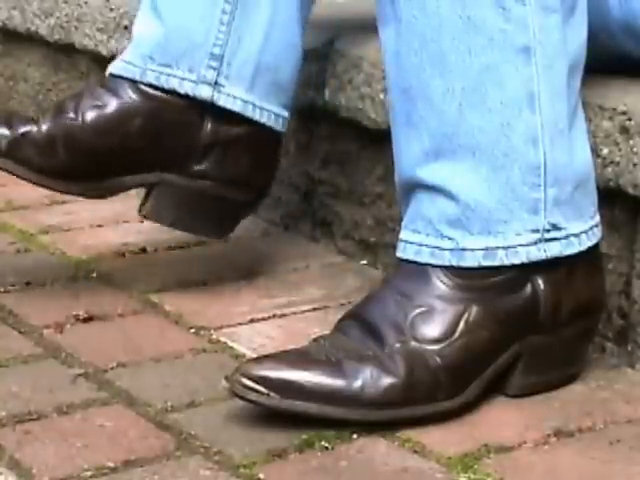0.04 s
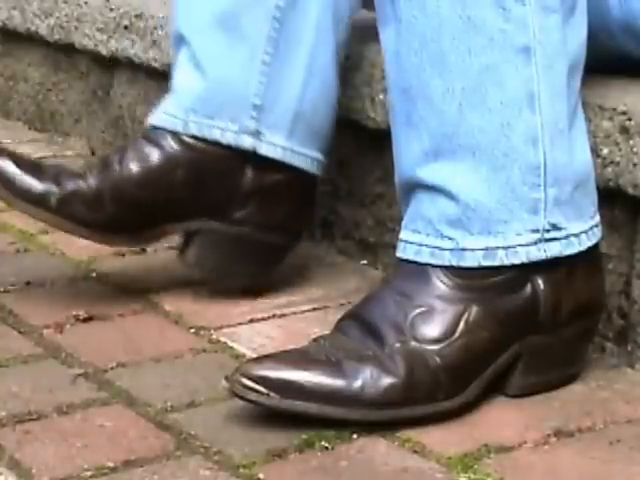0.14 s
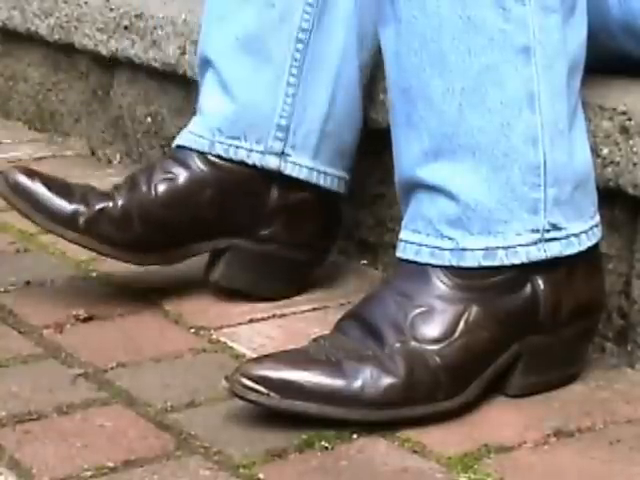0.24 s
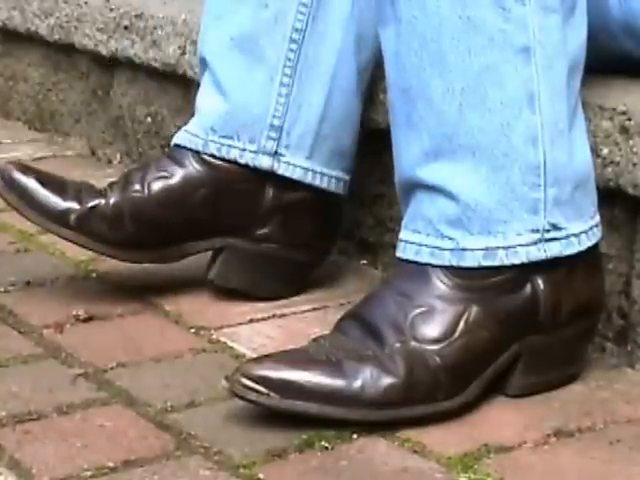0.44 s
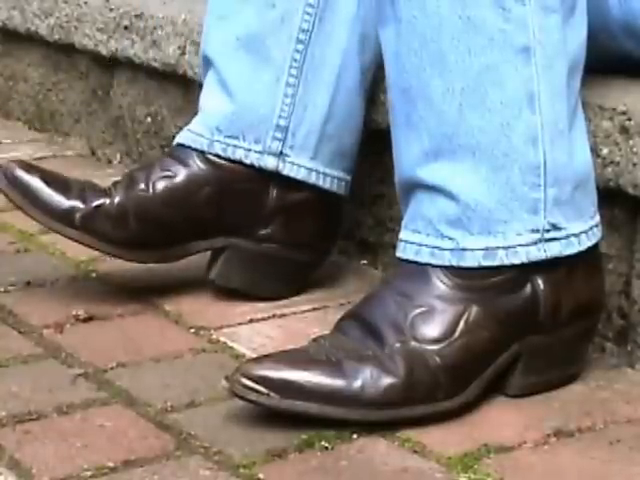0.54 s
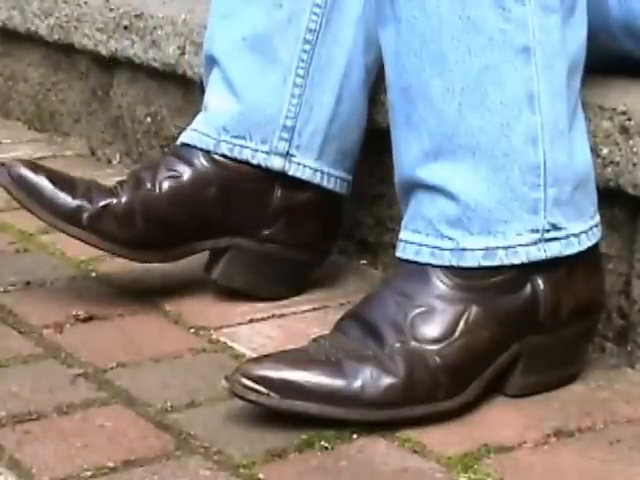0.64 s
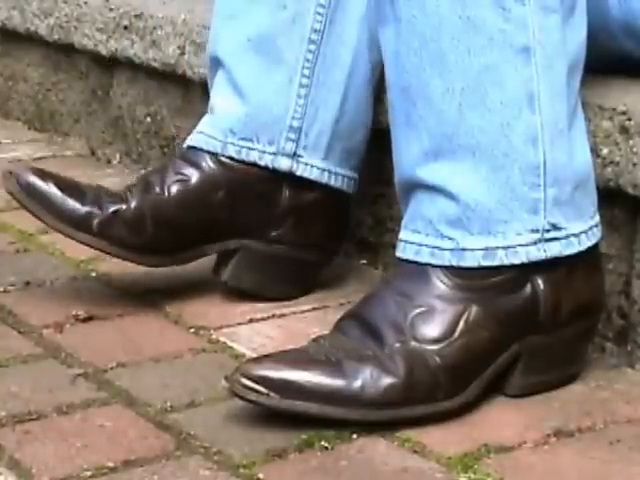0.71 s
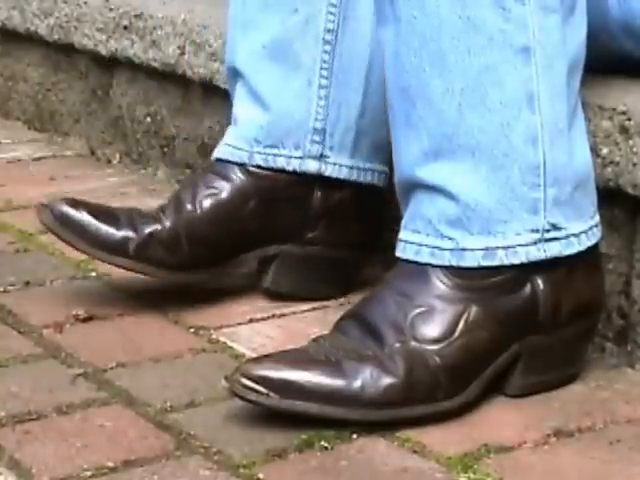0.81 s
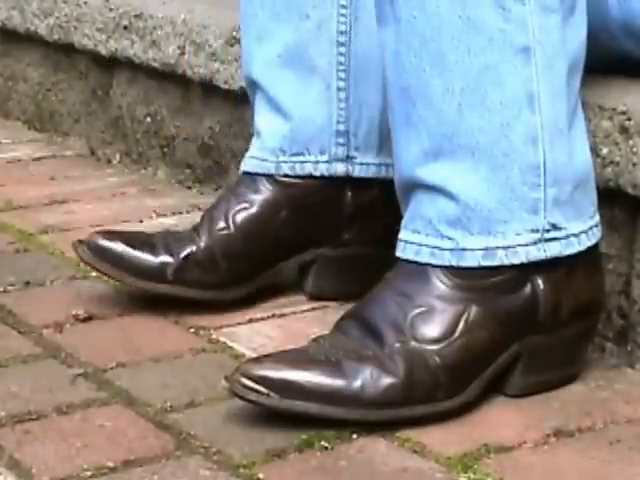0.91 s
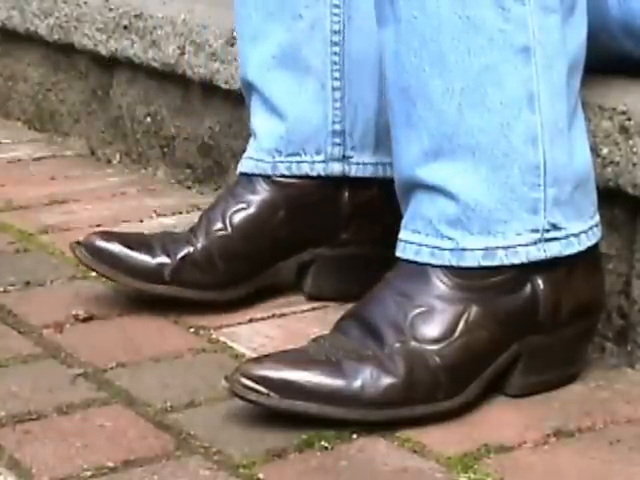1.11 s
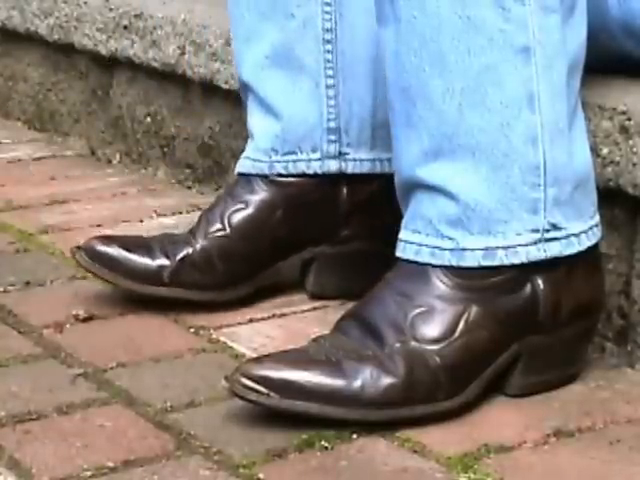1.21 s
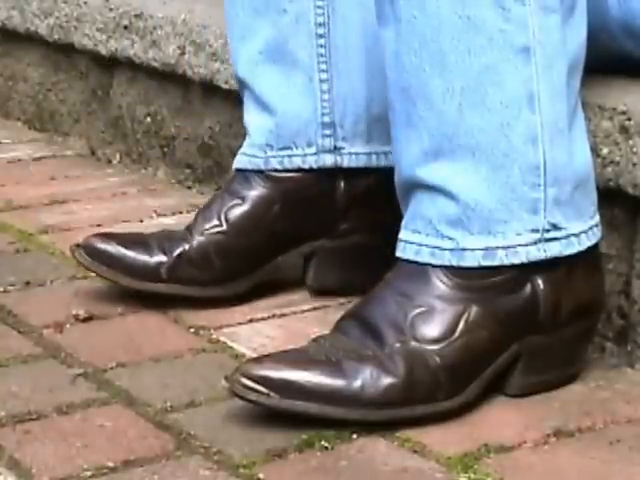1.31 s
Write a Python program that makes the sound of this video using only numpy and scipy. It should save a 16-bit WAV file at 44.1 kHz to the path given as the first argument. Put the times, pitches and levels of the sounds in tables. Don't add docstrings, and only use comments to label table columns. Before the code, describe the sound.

A single boot heel stomp strikes brick paving at about 0.2 seconds: a hard, hollow knock with crushed grit and a brief fluttering echo from the wall. Background town wash dips afterwards, as under automatic gain. From 0.7 to 1.0 seconds the sole scuffs quietly over sand, growing with crackles and a low judder. Soft knocks and three pebble ticks follow until 1.3 seconds. Close stereo pickup, quiet yard.

```python
import sys
import numpy as np
from scipy import signal
from scipy.fft import rfft, irfft
from scipy.io import wavfile
from scipy.ndimage import uniform_filter1d

SR = 44100
rng = np.random.default_rng(int(sys.argv[2]) if len(sys.argv) > 2 else 0)


def voltage_ratio(decibels):
    exponent = np.asarray(decibels, float) / 20
    return 10 ** exponent


def generate_wav(signal):
    frames = np.transpose(np.atleast_2d(signal))
    scaled = np.clip(frames, -1, 1) * 32767
    pcm = np.round(scaled).astype(np.int16)
    wavfile.write(sys.argv[1], SR, pcm)


N = 59535

# (frequency [Hz], level per Hz [dB])
AIR_SPECTRUM = [(20, -18), (35, 3), (130, -3.5), (250, -11.5), (700, -10), (1400, -12), (3500, -20.5),
                (7000, -34), (16000, -41)]
# (frequency [Hz], coherence [0-1])
AIR_COHERENCE = [(60, 0.95), (180, 1), (550, 0.62), (1650, 0.6), (4970, 0.91), (15000, 1)]
# (frequency [Hz], difference [dB])
AIR_PAN = [(60, 4), (240, 5), (950, 0.0), (3770, -1.0), (15000, 0.5)]
# (frequency [Hz], phase [rad])
AIR_LEAD = [(0, 0.82), (690, -0.82), (4050, -0.59), (6800, -1.2), (15800, -0.55)]
# (time [s], gain [dB])
RECORDER_GAIN = [
    (0, 4.5),
    (.12, 4),
    (.178, 6),
    (.188, -1.5),
    (.225, -4),
    (.27, -4),
    (.33, -1.5),
    (.7, -2.5),
    (1.35, -0.5),
]
# (frequency [Hz], T60 [s], level [dB])
YARD_TAIL = [(100, 0.53, -2), (190, 0.19, 3), (432, 0.068, -2), (895, 0.59, -2), (1200, 0.15, -14),
             (2000, 0.028, -6), (8000, 0.046, 0)]
# (frequency [Hz], difference [dB])
BOOT_PAN = [(60, 2.5), (180, 6.5), (550, 1.5), (1650, -1.5), (4970, -1), (15000, -3.5)]
# (frequency [Hz], phase [rad])
BOOT_LEAD = [(0, 1), (780, -1.04), (4220, -0.2), (6980, 0.024), (13400, 0.0), (15800, -0.19)]
# (time [s], peak [dB], frequency [Hz], breadth [held to 0.1-1.5])
SNAPS = [(.372, -45, 9550, 0.4), (0.7016, -43, 11500, 1.2), (0.7026, -41, 7000, 1.2),
         (.716, -50, 11900, 0.5), (0.7464, -46, 13000, 0.9), (0.7484, -51, 9000, 0.9),
         (0.757, -45, 11900, 0.9), (.7985, -32.5, 7360, 1), (0.8094, -26.5, 8000, 0.7),
         (.819, -37, 8000, 0.06), (0.823, -31, 11500, 0.4), (.825, -31, 12000, 1), (.8265, -34, 7000, 0.5),
         (0.827, -36, 5200, 0.3), (.8385, -53, 10000, .7), (.842, -43, 5600, 0.6), (.844, -32, 8200, 1),
         (0.848, -39, 5500, 0.8), (0.85, -44, 5800, .5), (.858, -34, 5600, 1), (.8625, -26.5, 6500, 1),
         (0.868, -35.5, 3400, .3), (.873, -51, 5500, .5), (.877, -41, 3400, 0.3), (0.8937, -30, 9300, 0.05),
         (0.895, -32, 3300, 0), (.897, -43, 4000, 0.9), (0.9055, -24.5, 5530, 1), (0.91, -32, 3400, .3),
         (.9118, -26.5, 8000, 0.54), (.9152, -38, 3500, 0.3), (0.922, -40, 3800, 0.3),
         (0.924, -34, 3900, .4), (0.9307, -37, 3700, .4), (.936, -44, 8000, 1)]
# (frequency [Hz], width [Hz], level [dB])
GRAIN_BANDS = [(3500, 900, 0), (5300, 1000, 0), (6600, 900, -3), (8250, 1100, 0), (9400, 1100, -2),
               (11400, 1300, -6), (13800, 2500, -11)]
# (time [s], peak [dB], frequency [Hz])
KNOCKS = [(.730, -30, 185), (.759, -31, 110), (.843, -28, 140), (.881, -28, 230), (.908, -29, 150),
          (.925, -34, 440), (.935, -31, 85), (.982, -33, 110), (1.09, -33, 75), (1.12, -33, 100),
          (1.14, -39, 350), (1.178, -35, 75), (1.204, -33, 140), (1.204, -39, 420), (1.2755, -34, 300),
          (1.312, -36, 80)]
# (time [s], energy [dB])
PEBBLE_TICKS = [
    (1.113, -31),
    (1.2025, -29),
    (1.2742, -19.5),
]
# (frequency [Hz], width [Hz], level [dB])
PEBBLE_BANDS = [(450, 500, 3), (1200, 1000, -2), (2200, 1200, 1), (3900, 900, -6)]
# (time [s], grit level [dB], body level [dB])
DRAG = [
    (.69, -74, -61),
    (.73, -51, -53),
    (.78, -50.5, -53),
    (.80, -46, -45),
    (.84, -42, -36),
    (.89, -39.5, -34.5),
    (.915, -40, -34.5),
    (.945, -55, -36),
    (.99, -64, -70),
]
# (frequency [Hz], width [Hz], level [dB])
SAND_BANDS = [(1770, 1160, 18.5), (2620, 380, 11), (3220, 2400, 16.5), (5540, 2900, 11), (6500, 390, 3),
              (7620, 2800, 6), (8740, 1500, 2), (11000, 1800, -20), (14400, 5100, -9)]
# (frequency [Hz], width [Hz], level [dB])
SOLE_BANDS = [(88, 32, 7), (147, 33, 7), (220, 110, 6), (305, 80, -1.5), (444, 140, -16), (805, 79, -16)]
# (time [s], frequency [Hz], level [dB])
JUDDER = [
    (.78, 271.2, -50),
    (.80, 274.7, -35),
    (.825, 313.6, -33.5),
    (.85, 278, -37.5),
    (.86, 278, -78),
]
# (frequency [Hz], level [dB], T60 [s])
OUTWARD_MODES = [(188.5, -14.2, .09), (425, 3.3, .017), (505, -19.5, .075), (586, -21.6, .049),
                 (1034, -1.5, .006), (1908, -23, .016), (834, -36, .06)]
# (frequency [Hz], level [dB], T60 [s])
INWARD_MODES = [(138, -12.2, .046), (312, -21.3, .102), (1304, -6.2, .006)]
# (time [s], energy [dB], frequency [Hz])
CRACKS = [(.2148, -13, 2400), (.2150, -20, 3500), (.2148, -27, 5200), (.2160, -16, 2100),
          (.2172, -15, 2900), (.2198, -23, 5200), (.2228, -24, 2800), (.2148, -33, 7200),
          (.2146, -31, 11500), (.2168, -33, 9500), (.2195, -31, 7900), (.2200, -35, 11600),
          (.2167, -31, 5500)]
# (time [s], peak [dB], frequency [Hz])
FLUTTER = [(.2290, -35, 810), (.232, -39, 1120), (.2335, -30, 500), (.239, -37, 850), (.246, -39, 1110),
           (.2495, -29, 495), (.250, -28, 360), (.2505, -29, 830), (.256, -38, 1065), (.2615, -32, 473),
           (.2625, -23, 172), (.2635, -35, 947), (.2655, -29, 700), (.2715, -37, 860), (.2775, -36, 550),
           (.279, -31, 355), (.2795, -33, 753), (.2875, -42, 1130), (.2895, -37, 613), (.2905, -30, 161),
           (.2925, -38, 915), (.2955, -37, 333), (.301, -36, 710), (.3055, -36, 818), (.3065, -35, 150),
           (.314, -38, 333), (.314, -40, 527), (.3205, -33, 118)]


def evened(x):
    return x / np.sqrt(np.mean(x ** 2) + 1e-20)


def read(points, hz):
    f, value = np.transpose(points)
    return np.interp(np.log(hz + 1), np.log(f + 1), value)


def curve(table, column):
    table = np.array(table)
    return np.interp(np.arange(N) / SR, table[:, 0], table[:, column])


def add(mix, at_s, sound):
    part = mix[round(at_s * SR):][:len(sound)]
    part += sound[:len(part)]


def resonate(x, hz, width_hz):
    turn = np.exp(2j * np.pi * hz * np.arange(len(x)) / SR)
    r = np.exp(-np.pi * width_hz / SR)
    return 2 * (turn * signal.lfilter([1 - r], [1, -r], x / turn)).real


def resonate_twice(x, hz, width_hz):
    return resonate(resonate(x, hz, width_hz), hz, width_hz)


def steep(x, hz, width_hz):
    y = resonate_twice(x, hz, width_hz)
    return y / np.linalg.norm(y)


def clicks(per_s, spread_db):
    size = voltage_ratio(spread_db * np.minimum(rng.exponential(1, N), 4))
    sign = rng.choice([-1., 1.], N)
    return evened(size * sign * (rng.random(N) < per_s / SR))


def port_half(pan, lead, hz):
    return voltage_ratio(read(pan, hz) / 2) * np.exp(.5j * read(lead, hz))


def air():
    level_db, patch_db = -39, 0.81
    hz = np.fft.rfftfreq(1024, 1 / SR)
    a, b, c, d, patches = rng.standard_normal((N // 256 + 5, 513, 5)).T
    patches = uniform_filter1d(patches, size=12, axis=0)
    patches = evened(uniform_filter1d(patches, size=10, axis=1))
    same = np.clip(read(AIR_COHERENCE, hz), 0, 1)[:, None]
    one, other = a + 1j * b, c + 1j * d
    half = port_half(AIR_PAN, AIR_LEAD, hz)[:, None]
    z = np.array([one * half, (same * one + np.sqrt(1 - same ** 2) * other) / half])
    z = z * voltage_ratio(read(AIR_SPECTRUM, hz)[:, None] + patch_db * patches)
    wash = signal.istft(z, nperseg=1024, noverlap=768)[1][:, :N]
    return voltage_ratio(level_db) * wash / wash.mean(0).std()


def yard(x):
    gap_s, onset_s = 0.017, 0.0047
    taps = rng.standard_normal((2, SR // 2)) * (rng.random((2, SR // 2)) < .2)
    hz, t, z = signal.stft(taps, SR, nperseg=512)
    table = np.array(YARD_TAIL)
    t60_s = read(table[:, [0, 1]], hz)[:, None]
    colour_db = read(table[:, [0, 2]], hz)[:, None]
    tail = signal.istft(z * voltage_ratio(colour_db - 60 * t / t60_s), SR, nperseg=512)[1]
    tail = tail * np.clip((np.arange(tail.shape[1]) / SR - gap_s) / onset_s, 0, 1)
    hz = np.fft.rfftfreq(tail.shape[1], 1 / SR)
    low = abs(rfft(tail)[:, (hz > 200) & (hz < 600)]).std() + 1e-9
    blended = tail + .5 * tail[::-1]
    return signal.fftconvolve(x[None], blended / low, axes=1)[:, :N]


def ports(x):
    half = port_half(BOOT_PAN, BOOT_LEAD, np.fft.rfftfreq(N, 1 / SR))
    return irfft(rfft(x) * np.array([half, 1 / half]) * 2 / (half + 1 / half), N)


def knocks():
    t60_s, rise_s = 0.085, 0.0017
    out, t = np.zeros(N), np.arange(3000) / SR
    for s, db, hz in KNOCKS:
        tone = voltage_ratio(db - 60 * t / t60_s) * np.sin(2 * np.pi * hz * t)
        add(out, s, tone * np.minimum(t / rise_s, 1))
    return out


def pebble_ticks():
    decay_s = .0012
    out, t = np.zeros(N), np.arange(3000) / SR
    for s, db in PEBBLE_TICKS:
        burst = .15 * rng.standard_normal(3000) * np.exp(-t / decay_s) - 2 * (t == 0)
        tick = sum(steep(burst, hz, 1.3 * width_hz) * voltage_ratio(d) for hz, width_hz, d in PEBBLE_BANDS)
        add(out, s, voltage_ratio(db) * tick)
    return out


def grain_snaps():
    decay_s, narrow_db = .0008, 9
    out, t = np.zeros(N), np.arange(3000) / SR
    for s, db, centre_hz, breadth in SNAPS:
        burst = .22 * rng.standard_normal(3000) * np.exp(-t / decay_s) + 2 * (t == 0)
        snap = np.zeros(3000)
        for hz, width_hz, band_db in GRAIN_BANDS:
            off = np.log2(hz / centre_hz) / np.clip(breadth, .1, 1.5)
            snap += steep(burst, hz, width_hz) * voltage_ratio(band_db - narrow_db * off ** 2)
        add(out, s, voltage_ratio(db) * snap / abs(snap).max())
    return out


def drag():
    crackle_db, rasp_db, body_db = -3, -8, -1.5
    start_s, stop_s = DRAG[0][0], DRAG[-1][0]
    moving = np.interp(np.arange(N) / SR, [start_s - .02, start_s, stop_s, stop_s + 0.032], [0, 1, 1, 0])
    sand = voltage_ratio(crackle_db) * clicks(3000, 2.6) + voltage_ratio(rasp_db) * rng.standard_normal(N)
    grit = sum(voltage_ratio(db) * resonate_twice(sand, hz, width_hz) for hz, width_hz, db in SAND_BANDS)
    grit = evened(grit) * sand.std()
    slips = uniform_filter1d(clicks(860, 2.7), size=20)
    body = evened(sum(voltage_ratio(db) * evened(resonate(slips, hz, width_hz)) for hz, width_hz, db in SOLE_BANDS))
    judder = voltage_ratio(curve(JUDDER, 2)) * np.sin(2 * np.pi * np.cumsum(curve(JUDDER, 1)) / SR)
    return moving * (grit * voltage_ratio(curve(DRAG, 1)) + body * voltage_ratio(curve(DRAG, 2) + body_db) + judder)


def flutter():
    level_db, smear_s, smear_turns, rough = -.5, .0042, .45, .25
    out, t = np.zeros(N), np.arange(2000) / SR
    for s, db, hz in FLUTTER:
        noise = rng.standard_normal(2000)
        swell_s = smear_s + smear_turns / hz
        tone = np.sin(2 * np.pi * hz * t + 3 * noise[0]) + rough * evened(steep(noise, hz, 220))
        envelope = (t / swell_s) ** 2 * np.exp(2 - 2 * t / swell_s)
        add(out, s - 1.2 * swell_s, voltage_ratio(db + level_db) * envelope * tone)
    return out


def cracks():
    decay_s = .0014
    out, t = np.zeros(N), np.arange(2000) / SR
    for s, db, hz in CRACKS:
        burst = rng.standard_normal(2000) * np.exp(-t / decay_s) + 4 * (t == 0)
        width_hz = 900 + .3 * hz
        add(out, s, voltage_ratio(db) * steep(steep(burst, hz, width_hz), hz, width_hz))
    return out


def ring(modes):
    rise_turns = .26
    t, out = np.arange(8000) / SR, np.zeros(8000)
    for hz, db, t60_s in modes:
        swell = (1 - np.exp(-t * hz / rise_turns)) ** 2
        out += voltage_ratio(db - 60 * t / t60_s) * np.sin(2 * np.pi * hz * t) * swell
    return out


def stomp():
    out = cracks() + flutter()
    add(out, .21526, ring(OUTWARD_MODES) - ring(INWARD_MODES))
    return out


def scene():
    yard_db = -27
    boot = stomp() + drag() + grain_snaps() + knocks() + pebble_ticks()
    return ports(boot) + voltage_ratio(yard_db) * yard(boot) + air() * voltage_ratio(curve(RECORDER_GAIN, 1))


def roll_off(x):
    return signal.sosfilt(signal.butter(12, 16220, fs=SR, output="sos"), x)


def record(dry):
    low_hz, top_hz = 28, 15950
    hz = np.fft.rfftfreq(N, 1 / SR)
    response = (hz < top_hz) / (1 + (low_hz / (hz + 1)) ** 6)
    band = irfft(rfft(dry) * response, N)
    return roll_off(np.clip(band, -.995, .995))


dry = scene()
out = record(dry)
generate_wav(out)
```